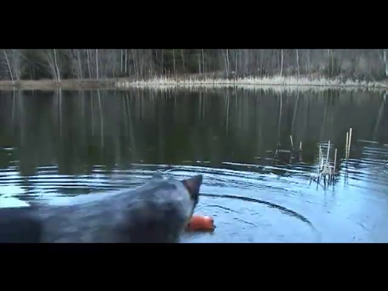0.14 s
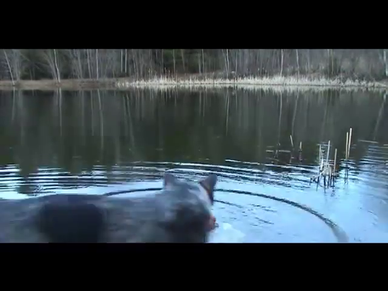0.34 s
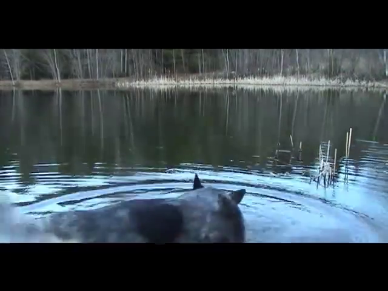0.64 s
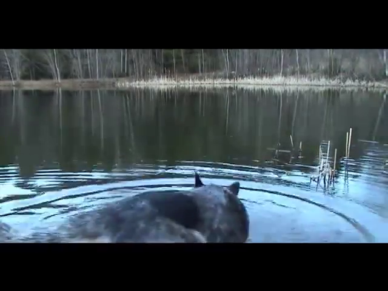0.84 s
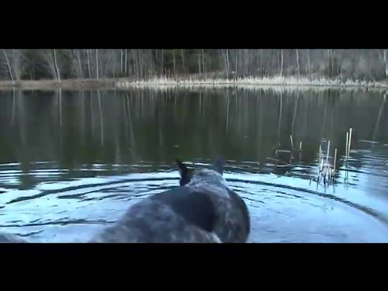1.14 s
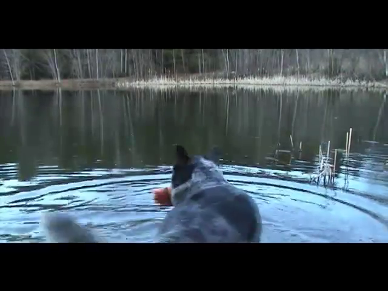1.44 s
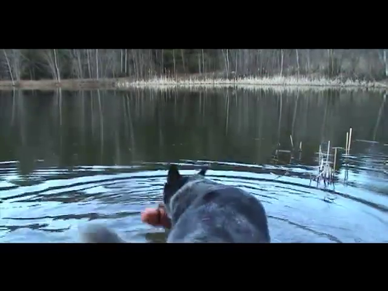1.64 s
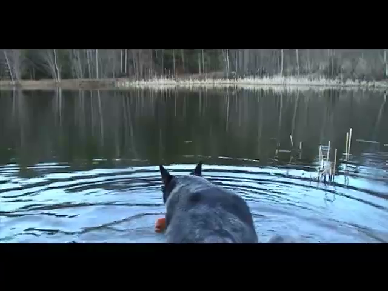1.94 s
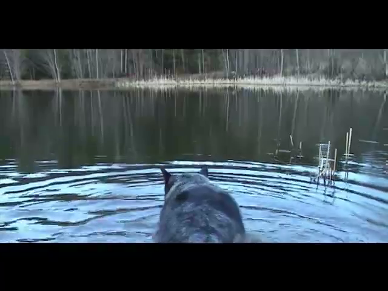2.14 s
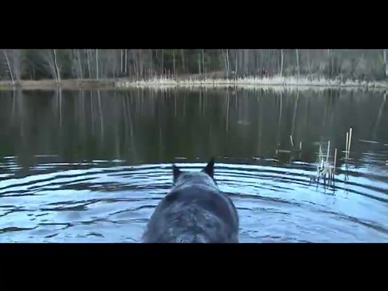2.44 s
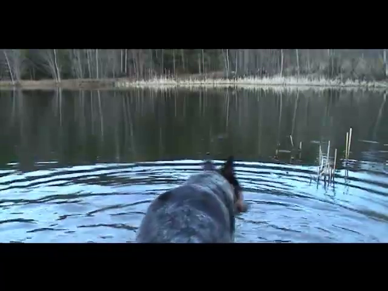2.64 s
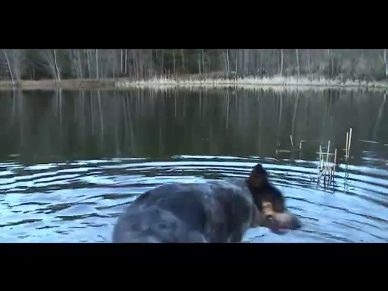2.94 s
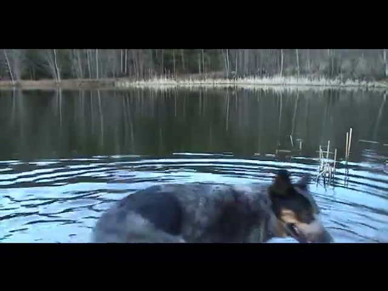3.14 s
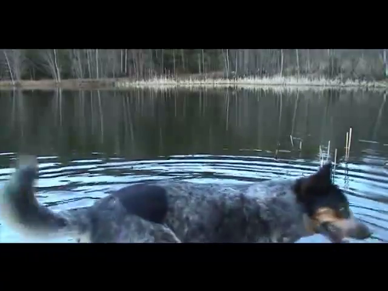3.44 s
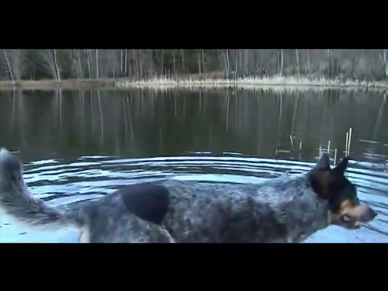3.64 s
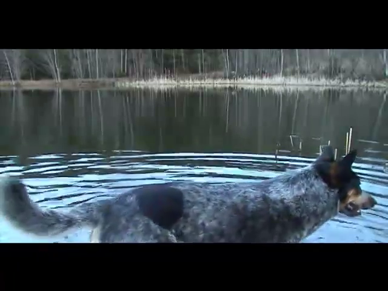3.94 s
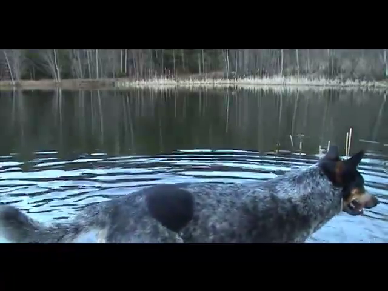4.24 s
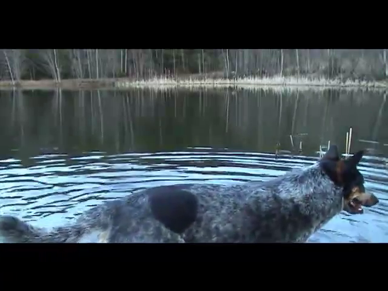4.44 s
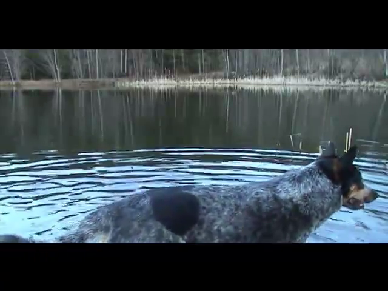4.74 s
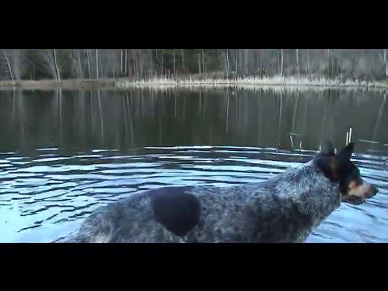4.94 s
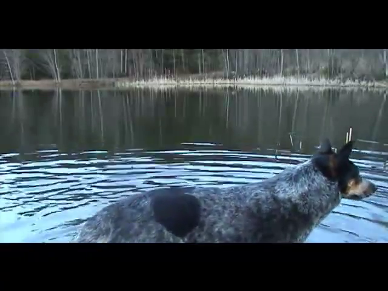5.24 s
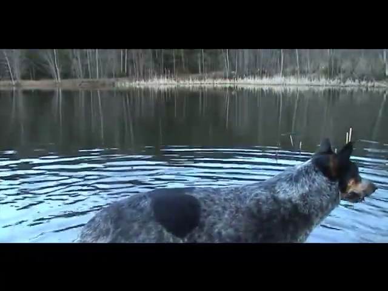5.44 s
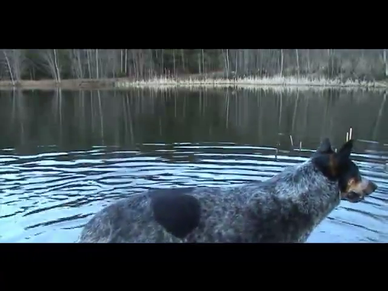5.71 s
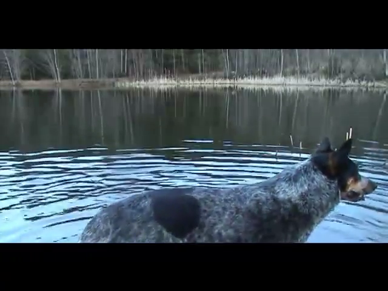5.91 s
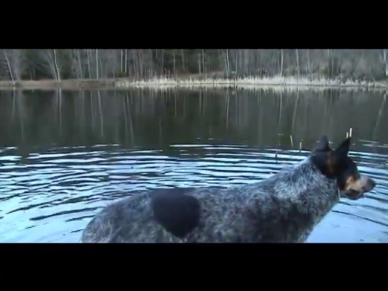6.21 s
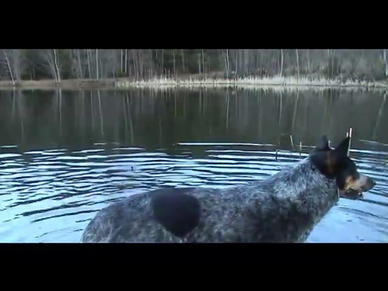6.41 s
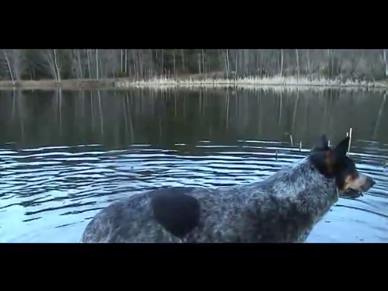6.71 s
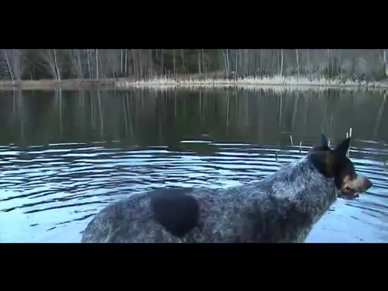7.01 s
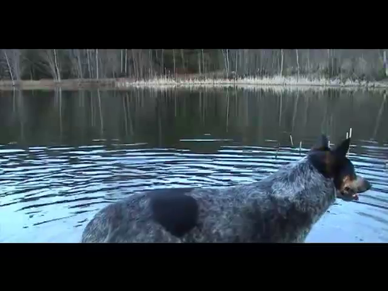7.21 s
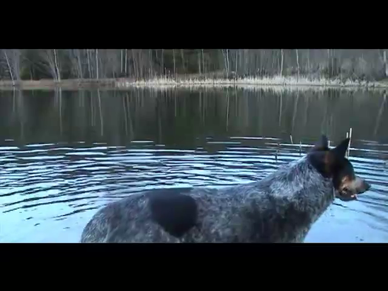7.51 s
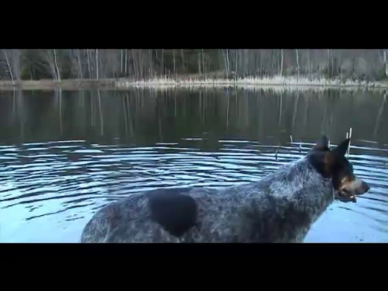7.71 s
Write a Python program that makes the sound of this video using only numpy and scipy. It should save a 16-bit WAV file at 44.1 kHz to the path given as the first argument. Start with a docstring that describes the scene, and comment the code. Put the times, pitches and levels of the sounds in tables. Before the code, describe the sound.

Countless tiny frogs whistle shrilly around a wooded pond; brief wading splashes and a deep plop open it, then only faint drips remain.

```python
"""Frog pond with a splashing dog

Spring peepers call all round a forest pond: short rising whistles, each near frog with its own pitch and glide.
Near calls are clear; far ones run together, blurred by the trees. A soft rush of air lies under them.
In the first second a wading dog splashes close by: noise and clicks make the spray and slaps,
ringing air pockets make the plops, one of them deep; then a few drops fall back."""
import sys
import numpy as np
from scipy import signal
from scipy.fft import rfft, irfft
from scipy.io import wavfile

SR = 44100
rng = np.random.default_rng(int(sys.argv[2]) if len(sys.argv) > 2 else 0)


def master_out(mix):
    """Clip the mix to full scale and print it as 16-bit PCM to the path in sys.argv[1]."""
    frames = np.transpose(np.atleast_2d(mix))
    ceiling = np.clip(frames, -1, 1)
    pcm = np.round(ceiling * 32767).astype(np.int16)
    wavfile.write(sys.argv[1], SR, pcm)


N = 346626

# Tone of the still air: f/Hz, relative level/dB
AIR_COLOUR = [(25, -16), (60, -6), (120, -3.5), (200, -0.5), (350, 0.5), (600, -3), (1200, -5), (1750, -5),
              (2150, -8.5), (3700, -22), (5500, -16.5), (8000, -18), (11000, -24.5)]
# Tone of the part of the air that differs between the ears: f/Hz, relative level/dB
AIR_WIDTH_COLOUR = [(25, -30), (250, -43), (500, 2), (900, 13.5), (1500, 9), (2100, -5), (4000, -56),
                    (7000, -11), (11000, -16.5)]
AIR_DB, AIR_WIDTH_DB = -49.5, -63
# Loudness of a faint high hiss: t/s, level/dB
HISS_LEVELS = [(3.64, -83), (3.71, -56.5), (4.15, -60), (4.4, -61), (4.6, -97)]
# Tone of that hiss: f/Hz, relative level/dB
HISS_COLOUR = [(2500, -30), (3800, 6), (5300, 13.5), (6500, -27)]

# Tone of the farthest frogs, blurred into one shrill ring: f/Hz, relative level/dB
WASH_COLOUR = [(2000, -42), (2250, -14), (2450, -8), (2650, 7.5), (3000, -0.5), (3200, -7.5), (3350, -13),
               (3650, -35.5), (4200, -11.5), (4900, -56.5)]
WASH_DB = -45
# Lulls, when few distant frogs call: t/s, depth/dB (below zero: a brief swell instead)
LULLS = [(.45, 9), (1.05, 4.5), (1.17, 0), (1.71, 5.5), (1.93, 4), (2.15, 5.5), (2.42, -1.5), (2.72, 2.5),
         (3.28, 3.5), (3.38, 3), (3.57, -0.5), (4.22, 2), (4.42, 3.5), (4.78, 3), (4.92, 3), (4.99, 2),
         (5.15, 8), (6.19, 4), (6.42, 0), (6.69, 2.5), (6.85, -0.5), (6.99, 1.5), (7.56, 3), (7.68, 0.5)]
LULL_S = 0.033  # about half the length of a lull
RISE_HZ_PER_S, RISE_SPREAD = 2453, .2  # upward glide of distant peeps; largest difference as a fraction

# Throws of water by the dog's legs, later only a dribble: t/s of the crest, level/dB, fade/s
SPRAY_THROWS = [(.005, -29.5, 0.033), (.045, -35, 0.048), (0.068, -33.5, 0.022), (0.134, -31, 0.037),
                (.182, -33.5, 0.055), (.245, -36.5, .05), (.275, -31.5, 0.078), (.325, -28.5, 0.032),
                (.378, -41, .03), (.4, -32, 0.037), (.45, -37.5, 0.037), (.495, -33.5, 0.031),
                (.545, -37, .03), (.595, -36, .018), (.618, -38, 0.035), (.652, -42.5, 0.014),
                (.704, -36.5, 0.015), (.735, -44, 0.055), (.795, -39, 0.029), (.852, -41, .03),
                (.89, -39.5, .05), (.947, -38.5, 0.037), (.982, -44, 0.053), (1.01, -45, 0.013),
                (1.08, -49, 0.28), (1.251, -50, 0.057), (1.63, -50.5, 0.27), (2.151, -49.5, .06)]
# Tone of the spray: f/Hz, relative level/dB
SPRAY_COLOUR = [(50, -39), (150, -37), (300, -2.5), (700, 4.5), (1600, 5), (2600, 7), (4500, 0.5),
                (7000, -2), (11000, -10)]
# Tone of the splashing that differs between the ears, mostly low slosh: f/Hz, relative level/dB
SLOSH_WIDTH_COLOUR = [(50, -2), (200, 5.5), (750, 14.5), (1200, -20), (3000, -35), (11000, -46.5)]
SPRAY_SWELL_S = .027
TRICKLE_DB = -67.5  # the wet coat keeps dripping
# Slaps of water: t/s, level/dB, fade/s
SLAPS = [(0.029, -32.5, 0.013), (.138, -40, 0.014), (0.298, -25, 0.014), (0.303, -26, 0.017),
         (0.32, -26, 0.007), (0.518, -25.5, 0.0088), (0.528, -20, 0.0087), (0.54, -41, .006),
         (.443, -38, 0.015), (.624, -38, 0.012), (.683, -42, .012)]
# Air pockets ringing in the water: t/s, level/dB, starting f/Hz
BUBBLES = [(0.029, -16.5, 1070), (.031, -25, 602), (.063, -30.5, 404), (.226, -34, 330), (.137, -26, 1760),
           (.288, -20, 626), (.297, -11, 643), (.304, -15, 744), (0.318, -20, 530), (.317, -20, 306),
           (.321, -13.5, 1560), (.448, -23, 1670), (.53, -19, 1350), (.623, -21, 874), (.625, -26, 707),
           (.641, -26, 630), (0.681, -21.5, 810), (.684, -27, 490), (.683, -23.5, 266), (.704, -21, 663),
           (.706, -21.5, 944), (.717, -28.5, 700), (.717, -27, 1940), (.793, -24.5, 1700),
           (.802, -21, 2500), (1.313, -33, 1610), (1.424, -38, 1850), (2.733, -37, 1790),
           (2.873, -39, 1740), (3, -35, 1720), (3.606, -35, 1680), (3.616, -32, 1920), (3.642, -40, 2030),
           (3.702, -37, 1790), (4.754, -38, 1700), (5.269, -36, 1720), (5.406, -33, 1790),
           (6.649, -35, 1710), (7.057, -37, 1930), (7.23, -34.5, 1770)]
RING_CYCLES = 30.2  # a pocket rings this many cycles until it is 60 dB down
LONGEST_RING_S = 0.05  # big pockets burst at the surface, so their ring is kept short
PLUNGE_S = .53  # a paw plunges in and opens one deep cavity
# Ringing tones of that cavity: starting f/Hz, level/dB, time to fall 60 dB/s
PLUNGE_TONES = [(205, -14, 0.11), (265, -9, 0.027), (88, -18, 0.023)]
# Single drops: t/s, level before the shared drop setting/dB, starting f/Hz
DROPS = [(.028, -17.5, 5000), (.044, -21, 6750), (.107, -26, 8400), (.241, -27, 9000), (.307, -24, 6600),
         (.398, -23, 7100), (.437, -27, 4700), (.4966, -20.5, 9000), (.594, -25, 4350), (.595, -26, 5450),
         (.614, -24, 5470), (.656, -21, 3670), (0.703, -23, 4900), (0.78, -15, 4520), (.852, -33, 3350),
         (.887, -28, 4440), (1.007, -26, 4120), (1.014, -30, 4500), (1.6, -30.5, 8300), (1.624, -29, 8740),
         (1.656, -30.5, 4400), (1.849, -36, 8250), (2.0645, -28.5, 5670), (2.166, -31, 7550),
         (2.167, -33, 4600)]
# Ripples patting against the dog's legs: t/s, level/dB, middle f/Hz
LAPS = [(1.998, -37.5, 420), (2.716, -38.5, 460)]
SPLASH_ECHO_DB = -22.5  # the trees answer the dog's plops too

# Peeps of the near frogs: t/s, frog's letter, level before a small shared boost/dB
PEEPS = [(0.001, "K", -38.5), (0.002, "G", -39), (.095, "I", -38.5), (0.152, "M", -33.5),
         (.315, "K", -37.5), (.467, "L", -38), (.482, "J", -30.5), (.599, "F", -32), (.623, "G", -35),
         (.632, "I", -44), (.699, "N", -32.5), (.708, "M", -42), (0.815, "J", -30.5), (0.878, "O", -38),
         (.958, "I", -36), (1.048, "G", -39.5), (1.194, "E", -34.5), (1.22, "B", -47.5), (1.253, "A", -48),
         (1.347, "N", -31), (1.353, "M", -36), (1.392, "B", -45), (1.403, "L", -38), (1.419, "E", -37),
         (1.454, "O", -33), (1.535, "J", -38), (1.536, "M", -32.5), (1.574, "I", -36.5),
         (1.714, "P", -36.5), (1.761, "C", -32), (1.821, "G", -33), (1.905, "F", -31), (1.909, "I", -35.5),
         (2.045, "H", -35), (2.07, "A", -52), (2.128, "B", -46), (2.183, "M", -32.5), (2.188, "N", -34),
         (2.194, "K", -34), (2.257, "O", -33.5), (2.411, "H", -36.5), (2.468, "B", -52),
         (2.485, "I", -35.5), (2.487, "E", -33), (2.505, "O", -32), (2.586, "N", -38), (2.637, "D", -33.5),
         (2.76, "K", -36), (2.777, "F", -34.5), (2.786, "P", -34), (2.823, "G", -39), (2.865, "H", -40),
         (2.91, "A", -52), (2.932, "N", -32), (2.967, "D", -38.5), (3.037, "I", -30.5), (3.166, "F", -32),
         (3.21, "B", -46), (3.283, "G", -36), (3.319, "K", -37), (3.399, "E", -39), (3.399, "O", -28.5),
         (3.6, "D", -31), (3.61, "A", -52), (3.664, "H", -30), (3.666, "B", -49), (3.703, "J", -35.5),
         (3.722, "I", -39), (3.783, "N", -34), (3.791, "E", -34), (3.794, "M", -37), (3.894, "K", -34.5),
         (4.034, "P", -33.5), (4.097, "H", -37), (4.289, "J", -34), (4.316, "B", -45), (4.435, "C", -36),
         (4.448, "G", -33), (4.458, "E", -39), (4.484, "N", -30), (4.509, "K", -33.5), (4.526, "J", -39),
         (4.594, "M", -31), (4.63, "A", -53), (4.656, "D", -30.5), (4.835, "H", -37.5), (4.999, "H", -34),
         (5.023, "J", -33), (5.149, "K", -35.5), (5.177, "E", -36), (5.178, "C", -31), (5.195, "G", -39),
         (5.206, "J", -37), (5.23, "B", -47), (5.296, "D", -31.5), (5.297, "P", -32), (5.346, "I", -35),
         (5.447, "O", -31.5), (5.49, "A", -52), (5.557, "J", -32), (5.598, "C", -41), (5.621, "G", -38),
         (5.678, "M", -30.5), (5.68, "B", -52), (5.813, "K", -34.5), (5.86, "E", -36.5), (5.954, "P", -33),
         (6.006, "G", -37.5), (6.051, "H", -37.5), (6.06, "D", -37), (6.061, "M", -38.5), (6.196, "J", -32),
         (6.23, "B", -50), (6.28, "N", -29.5), (6.31, "A", -52), (6.401, "K", -37.5), (6.43, "M", -30.5),
         (6.505, "O", -35), (6.513, "E", -33), (6.54, "P", -32), (6.541, "D", -31.5), (6.544, "G", -36),
         (6.673, "F", -38), (6.706, "H", -36), (6.754, "E", -41), (6.797, "J", -31.5), (6.838, "G", -34.5),
         (6.982, "J", -35), (7.025, "F", -38), (7.115, "D", -38), (7.123, "P", -32), (7.134, "G", -33),
         (7.153, "E", -35), (7.157, "N", -29.5), (7.192, "M", -29), (7.239, "O", -39), (7.314, "A", -50),
         (7.324, "E", -39), (7.353, "B", -48), (7.38, "L", -39), (7.39, "J", -29.5), (7.463, "G", -38),
         (7.557, "E", -37), (7.576, "J", -39), (7.589, "K", -36), (7.724, "P", -33), (7.754, "F", -35)]
# Voices by letter: middle f/Hz, rise/Hz per s, length/s, left-right balance/dB, side tone boost/dB
FROGS = {"A": (2331, 1900, 0.15, -1, -7), "B": (2450, 2000, .11, 0, -7),
         "C": (2571.5, 2570, 0.0954, -2, -5), "D": (2679, 2553, 0.1, 3, 2.8),
         "E": (2726, 2498, 0.1121, -6.5, -4), "F": (2740, 3142, 0.13, -6.5, -3),
         "G": (2781, 2997, 0.1373, -6.5, 2.5), "H": (2821, 2542, 0.14, -4, 0),
         "I": (2823.5, 2263, 0.14, 7, -0.5), "J": (2858, 2766, 0.142, 4, -1.5),
         "K": (2868, 2390, 0.1636, 11.5, -3.5), "L": (2904.5, 1254, 0.17, -4, 3),
         "M": (2914.5, 3347, 0.1, -7.5, -1.5), "N": (2953.5, 2711, .123, -6.5, -1.5),
         "O": (3015.5, 2307, 0.0914, -7, 0), "P": (3037, 1587, 0.0856, 10.5, 0)}
# Tones in one peep: multiple of its pitch, level before any side tone boost/dB
PARTIALS = [(1 / 2, -30.5), (1, 0), (3 / 2, -29.5), (2, -38.5)]
FLUTTER = .09  # unsteadiness: a fraction of the level, and radians of phase
FLUTTER_PER_DB = 0.032  # the fainter a near frog, the more its note breaks up
WOODS_T60_S = .7  # time for the echo of the trees to fall 60 dB
CUTOFF_HZ = 10900


def from_db(db):
    """Turn decibels into a gain."""
    return 10 ** (np.asarray(db) / 20)


def rms_one(x):
    """Scale a sound to an average power of one."""
    return x / np.sqrt(np.mean(x ** 2) + 1e-20)


def gain_curve(rows):
    """Turn rows of time and level into a gain for every sample."""
    return from_db(np.interp(np.arange(N) / SR, *np.transpose(rows)))


def add(out, s, sound, pan_db=0):
    """Mix a sound into the stereo track at a time and a direction (positive is left)."""
    at = max(round(s * SR), 0)
    part = sound[:max(N - at, 0)]
    sides = from_db([[pan_db / 2], [-pan_db / 2]])
    out[:, at:at + len(part)] += part * sides / sides.mean()


def coloured(x, spectrum):
    """Give a sound a smooth tone colour, then scale its power to one."""
    hz, db = np.transpose(spectrum)
    bins = np.maximum(np.arange(N // 2 + 1) * SR / N, 1)
    gain = from_db(np.interp(np.log(bins), np.log(hz), db))
    return rms_one(irfft(rfft(x) * gain, N))


def stereo(mid, side, side_db):
    """Make left and right from a shared centre plus and minus a difference."""
    return mid + from_db(side_db) * side * np.array([[1], [-1]])


def woods(x, side_db):
    """Countless trunks scatter the sound back: modelled as dying noise."""
    t = np.arange(int(WOODS_T60_S * SR)) / SR
    fade = from_db(-60 * t / WOODS_T60_S) * (1 - np.exp(-t / 0.0035))
    mid, side = rng.standard_normal((2, len(t))) * fade
    echoes = stereo(mid, side, side_db) / np.sqrt(np.sum(mid ** 2))
    return signal.fftconvolve(x, echoes, axes=1)[:, :N]


def air():
    """A soft steady rush, widest in the middle range, and for a moment a thin hiss above it."""
    rush = from_db(AIR_DB) * coloured(rng.standard_normal(N), AIR_COLOUR)
    hiss = gain_curve(HISS_LEVELS) * coloured(rng.standard_normal(N), HISS_COLOUR)
    difference = coloured(rng.standard_normal(N), AIR_WIDTH_COLOUR)
    return stereo(rush + hiss, difference, AIR_WIDTH_DB)


def farthest_frogs(width_db=-8):
    """From across the pond no single call survives, only a band of noise at their common pitch."""
    mid, side = coloured(rng.standard_normal((2, N)), WASH_COLOUR)
    return from_db(WASH_DB) * stereo(mid, side, width_db)


def peep(length, hz, rise_hz_per_s, side_tones_db=0, flutter=FLUTTER,
         attack_s=0.0094, release_s=0.03, bow_hz=3, flutters_per_s=110):
    """The vocal sac whistles one rising note; paths over the water make its level and phase flutter."""
    t = np.arange(int(max(length, .02) * SR)) / SR
    pitch = hz + rise_hz_per_s * (t - t[-1] / 2) + bow_hz * np.sin(np.pi * t / t[-1])
    ripples = rng.standard_normal(size=(2, 64))
    waver, wobble = (flutter * np.interp(t * flutters_per_s, np.arange(len(r)), r) for r in ripples)
    phase = 2 * np.pi * (np.cumsum(pitch) / SR + rng.random()) + wobble
    ramp = np.clip(np.minimum(t / attack_s, (t[-1] - t) / release_s), 0, 1)
    swell = np.sin(np.pi / 2 * ramp) ** 2
    note = np.zeros(len(t))
    for multiple, db in PARTIALS:
        boost_db = side_tones_db * (multiple != 1)
        note += from_db(db + boost_db) * np.sin(multiple * phase)
    return swell * (1 + waver) * note


def odd_frogs(count=60, low_hz=2440, high_hz=3110, level_db=-54, spread_db=3):
    """Big and small frogs call faintly in turn, at the low and high edges of the band."""
    out = np.zeros((2, N))
    for k, (when, size, far) in enumerate(rng.uniform(-1, 1, (count, 3))):
        hz = (high_hz if k % 2 else low_hz) + 80 * size
        call = peep(0.12, hz, RISE_HZ_PER_S, flutter=0.4)
        add(out, (k + 1 + when) / count * N / SR, from_db(level_db + spread_db * far) * call)
    return out + woods(out, side_db=-19)


def far_frogs(count=640, centre_hz=2835, spread_hz=215, length_s=.125, level_db=-37, echo_db=-9):
    """Calls of many sizes and distances merge into a shrill band; the biggest and smallest frogs are weak."""
    out = np.zeros((2, N))
    for k, (when, size, far, where, effort, glide) in enumerate(rng.uniform(-1, 1, (count, 6))):
        length = length_s * np.exp(0.2497 * effort)
        rise = RISE_HZ_PER_S * (1 + RISE_SPREAD * glide)
        call = peep(length, centre_hz + spread_hz * size, rise)
        db = 3.4 * far - 2.4 * size ** 2
        add(out, (k + when) / count * N / SR - .05, from_db(db) * call, 10.0 * where - 1.3)
    return from_db(level_db) * rms_one(out + from_db(echo_db) * woods(out, side_db=-17))


def chorus_effort():
    """The distant frogs fall briefly quiet together, or now and then swell a little."""
    t = np.arange(0, N, 100) / SR
    dip = sum(depth * np.exp(-((t - s) / LULL_S) ** 2) for s, depth in LULLS)
    return gain_curve(np.column_stack([t, -dip]))


def spray_flow():
    """How much water is falling: each throw swells and dies away, over a faint trickle."""
    t = np.arange(0, N, 40) / SR
    power = from_db(TRICKLE_DB) ** 2
    for s, db, fade in SPRAY_THROWS:
        shape = np.exp(-np.maximum((s - t) / SPRAY_SWELL_S, (t - s) / fade))
        power = power + (from_db(db) * shape) ** 2
    return np.interp(np.arange(N) / SR, t, np.sqrt(power))


def droplets(drops_per_s=3000, count=14):
    """Each droplet is a click, up or down, that rings briefly in one of several pitch bands."""
    chance, dealt = rng.random(N), rng.integers(0, count, N)
    clicks = rng.choice([-1, 1], N) * (chance < drops_per_s / SR)
    edges = np.geomspace(250, 13000, count + 1)  # Hz
    out = np.zeros(N)
    for k in range(count):
        b, a = signal.butter(1, edges[k:k + 2], "band", fs=SR)
        out += signal.lfilter(b, a, clicks * (dealt == k) + 1e-18)
    return out


def splashing(mist_db=-12, clump_db=1.0, clumps_per_s=90, width_db=-20):
    """Thousands of droplets patter on the pond in clumps; each slap throws up a dense burst of noise."""
    patter = coloured(droplets(), SPRAY_COLOUR)
    mist = coloured(rng.standard_normal(N), SPRAY_COLOUR)
    t, bursts = np.arange(N) / SR, np.zeros(N)
    for s, db, fade in SLAPS:
        age = np.clip(t - s, 0, .3)
        bursts += from_db(db) * (1 - np.exp(-age / 0.0013)) * np.exp(-age / fade)
    unevenness = np.interp(t * clumps_per_s, np.arange(N), rng.standard_normal(N))
    flow = spray_flow() * rms_one(from_db(clump_db * unevenness))
    slosh = coloured(rng.standard_normal(N), SLOSH_WIDTH_COLOUR)
    spray = flow * rms_one(patter + from_db(mist_db) * mist)
    return stereo(spray + bursts * mist, (flow + bursts) * slosh, width_db)


def bubble(hz, t60, rise):
    """A trapped pocket of air rings, rising in pitch as it nears the surface."""
    t = np.arange(int(t60 * SR)) / SR
    fade = from_db(-60 * t / t60) * (1 - np.exp(-t * hz * 2))
    return fade * np.sin(2 * np.pi * hz * t * (1 + rise * t / t60))


def fizz(count=800, low_hz=600, high_hz=9000, cycles=22, spread_db=4.5):
    """Spray drags small bubbles under; each rings briefly at its own pitch."""
    out, spray = np.zeros((2, N)), spray_flow()
    for when, size, force in rng.random((count, 3)):
        s = 3.1 * when
        hz = low_hz * (high_hz / low_hz) ** size
        gain = spray[int(s * SR)] * from_db(-spread_db * np.log(0.12 + 1.1 * force))
        add(out, s, gain * bubble(hz, cycles / hz, rise=0.038))
    return out


def laps(band_ratio=1.85, fade_s=0.0093):
    """A ripple meets a leg with a short dull pat of noise."""
    out, t = np.zeros((2, N)), np.arange(SR // 10) / SR
    for s, db, hz in LAPS:
        dull = signal.butter(2, [hz / band_ratio, hz * band_ratio], "band", fs=SR, output="sos")
        noise = rms_one(signal.sosfilt(dull, rng.standard_normal(len(t))))
        add(out, s, from_db(db) * np.exp(-t / fade_s) * noise)
    return out


def gurgles(count=12, low_hz=330, high_hz=1500, level_db=-1, follows=0.58, lag_s=0.016, cycles=12, spread_db=3):
    """Each slap drags air under, which breaks up into short mixed gulps, louder for hard slaps."""
    out, hardest_db = np.zeros((2, N)), max(row[1] for row in SLAPS)
    for s, db, _ in SLAPS:
        slap_db = hardest_db + follows * (db - hardest_db)
        for when, size, force in rng.random((count, 3)):
            hz = low_hz * (high_hz / low_hz) ** size
            gulp_db = slap_db + level_db - spread_db * (1 + 2 * force)
            delay = -lag_s * np.log(1 - .95 * when)  # most gulps come soon after the slap
            add(out, s + delay, from_db(gulp_db) * bubble(hz, cycles / hz, rise=0.06))
    return out


def plops(drop_db=-2, tick=0.26, low_cut_hz=38):
    """Big air pockets gulp under the dog, small ones blip as its coat drips; single drops tick and ping."""
    out = np.zeros((2, N))
    for s, db, hz in BUBBLES:
        ring_s = min(RING_CYCLES / hz, LONGEST_RING_S)
        add(out, s, from_db(db) * bubble(hz, ring_s, rise=0.012), -.8)
    for hz, db, t60 in PLUNGE_TONES:
        add(out, PLUNGE_S, from_db(db) * bubble(hz, t60, rise=0.012))
    for s, db, hz in DROPS:
        ping = bubble(hz, 0.0058, rise=0.16)
        impact = rng.standard_normal(len(ping)) * np.exp(-np.arange(len(ping)) / SR / 0.00024)
        add(out, s, from_db(db + drop_db) * (ping + tick * impact))
    # the open surface radiates little bass
    return signal.sosfilt(signal.butter(2, low_cut_hz, "high", fs=SR, output="sos"), out)


def near_frogs(direct_db=0.08, echo_db=-43.5, echo_follows=0.64):
    """Frogs of the nearest reeds, answered by the trees; fainter ones sit farther off, with more echo."""
    direct, sent = np.zeros((2, 2, N))
    typical_db = np.median([row[2] for row in PEEPS])
    for s, frog, db in PEEPS:
        hz, rise, length, pan_db, side_tones_db = FROGS[frog]
        flutter = FLUTTER + FLUTTER_PER_DB * max(typical_db - db, 0)
        call = peep(length, hz, rise, side_tones_db, flutter)
        add(direct, s, from_db(db + direct_db) * call, pan_db)
        add(sent, s, from_db(echo_db + echo_follows * (db - typical_db)) * call, pan_db)
    return direct + woods(sent, side_db=-6.0)


def scene():
    """The air, the dog in the shallows and the frogs round the pond."""
    gulps = plops() + gurgles()
    gulp_echo = from_db(SPLASH_ECHO_DB) * woods(gulps, side_db=-9)
    dog = splashing() + fizz() + laps() + gulps + gulp_echo
    distant_frogs = chorus_effort() * (far_frogs() + odd_frogs() + farthest_frogs())
    return air() + distant_frogs + dog + near_frogs()


def record(dry):
    """The recorder cuts the treble steeply above the cutoff."""
    return signal.sosfilt(signal.ellip(12, .1, 80, CUTOFF_HZ, fs=SR, output="sos"), dry)


dry = scene()
out = record(dry)
master_out(out)
```